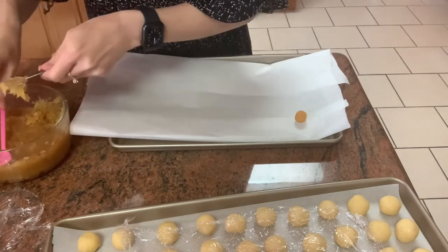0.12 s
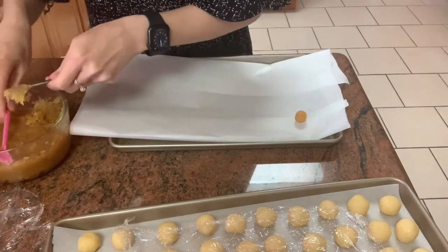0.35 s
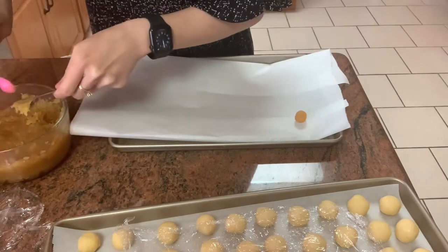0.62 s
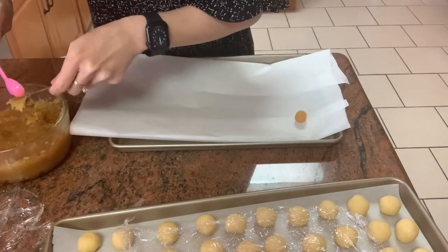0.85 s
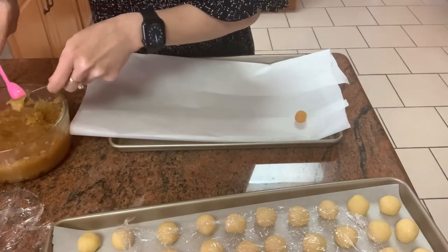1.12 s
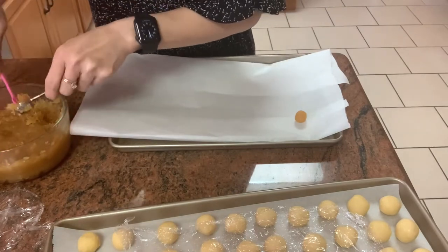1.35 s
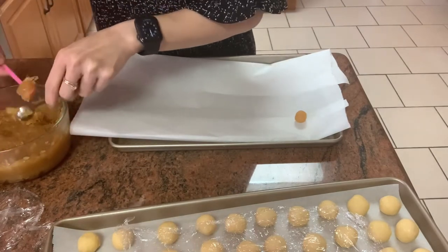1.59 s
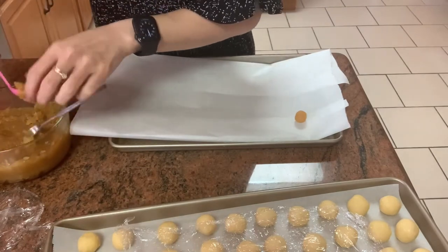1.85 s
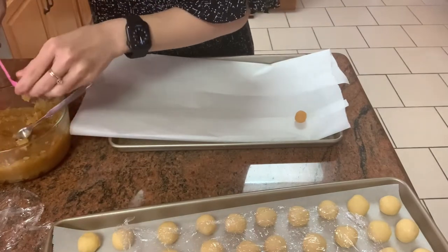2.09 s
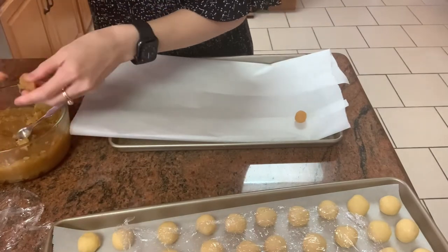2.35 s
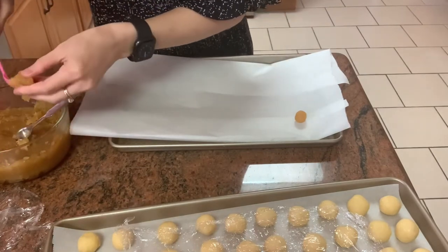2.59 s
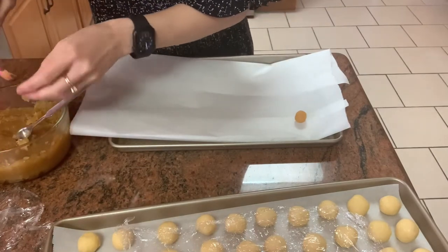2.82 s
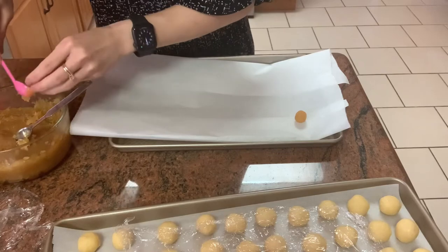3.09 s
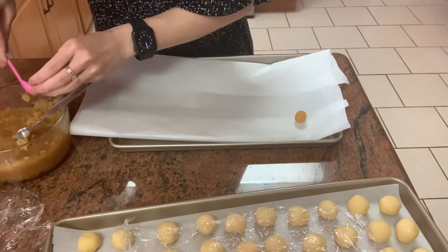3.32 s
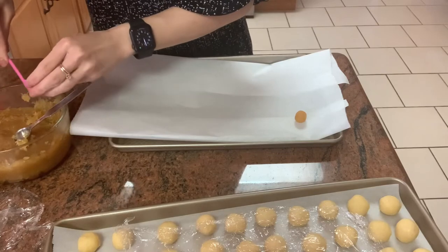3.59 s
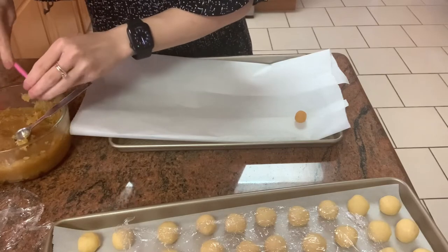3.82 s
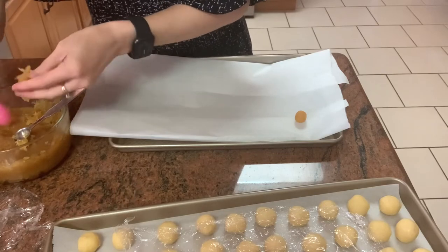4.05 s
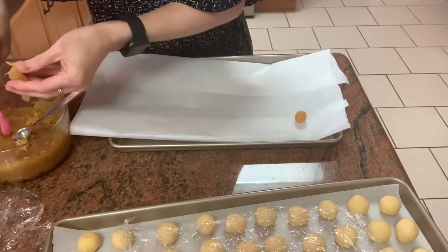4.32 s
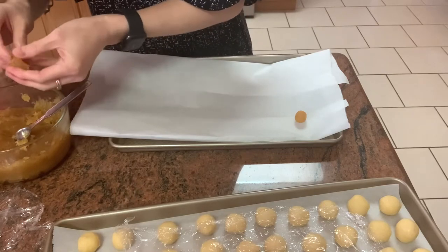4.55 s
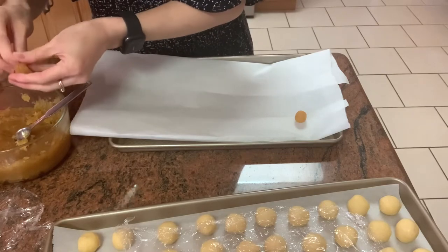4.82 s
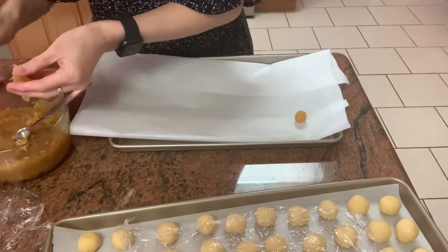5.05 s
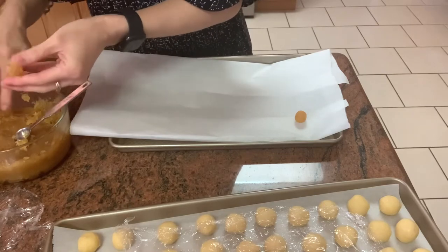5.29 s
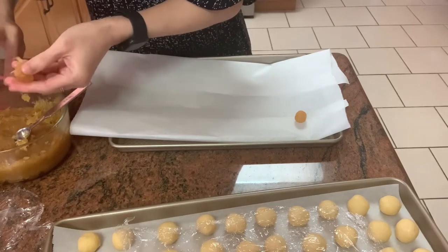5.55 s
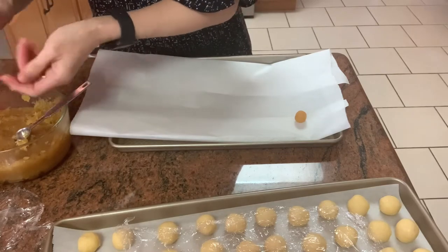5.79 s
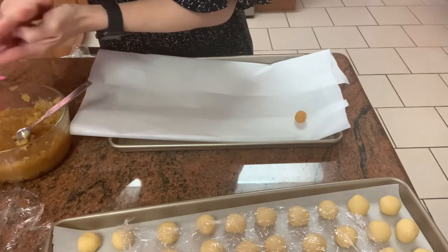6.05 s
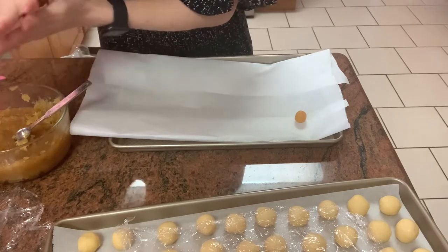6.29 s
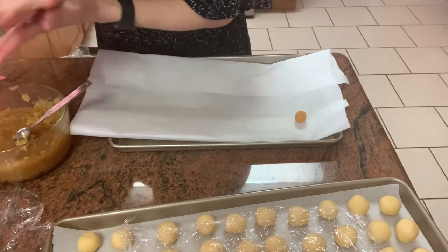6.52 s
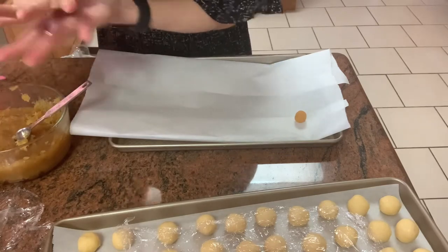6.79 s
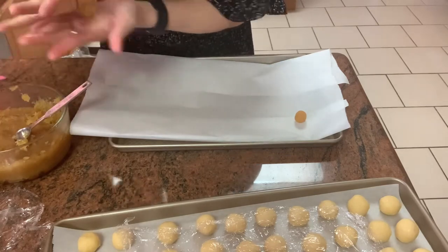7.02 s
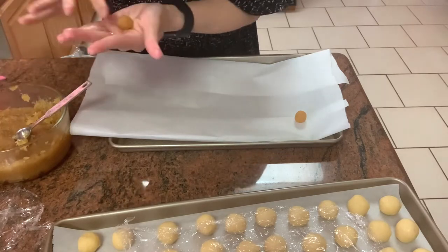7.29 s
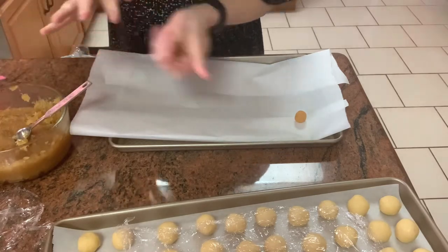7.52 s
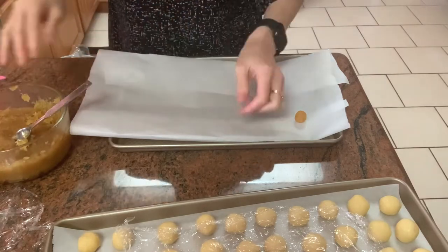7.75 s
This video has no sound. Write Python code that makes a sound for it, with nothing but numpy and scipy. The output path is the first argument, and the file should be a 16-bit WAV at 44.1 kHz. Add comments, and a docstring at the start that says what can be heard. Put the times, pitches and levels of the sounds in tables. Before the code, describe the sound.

Quiet tiled kitchen with appliance hum: bright spoon-on-glass clinks, a rattling utensil drop, sticky hand rubbing, then one flat slap across the room.

```python
"""Spoon, glass and jam in a kitchen

A steel measuring spoon clinks on a glass bowl of jam and a utensil clatters down beside it: damped modes.
Sticky fingers tick, palms rub a ball of jam round and something flat slaps down across the kitchen: shaped noise.
Appliances hum as coloured noise; tiles answer with decaying noise tails. Two microphone ports are alike in
the bass, and in the treble carry one signal that reaches the right side later."""
import sys
import numpy as np
from scipy import signal
from scipy.fft import rfft, irfft, next_fast_len
from scipy.io import wavfile
from scipy.ndimage import uniform_filter1d, map_coordinates

SR = 44100
rng = np.random.default_rng(int(sys.argv[2]) if len(sys.argv) > 2 else 0)


def to_wav(s):
    """Save 16-bit WAV."""
    ch = np.atleast_2d(s).T  # columns
    pcm = np.round(np.clip(ch, -1, 1) * 32767)  # PCM
    wavfile.write(sys.argv[1], SR, pcm.astype(np.int16))


def amplitude_ratio(level_db):
    """Convert a level in decibels to the matching linear amplitude (field) ratio."""
    exponent = np.asarray(level_db, float) / 20
    return 10 ** exponent


N = 347949  # samples

# Modes of the utensil's steel. Each row: frequency in Hz, relative level in dB, 60 dB decay time in seconds.
STEEL = [(1685, -10.5, 0.035), (2500, -26, .03), (3670, -27.5, 0.043), (4260, -31.5, 0.028),
         (5100, -22.5, 0.025), (5430, -4, 0.052), (6360, -0.5, 0.063), (7970, -7.5, 0.075),
         (8800, 0.5, 0.082), (10440, 3, 0.026), (12300, 1.5, .045), (12860, -8.5, 0.033),
         (14650, -0.5, 0.048), (15650, -3, .045), (15040, 4, 0.046)]
# Modes of the dull body under a knock, before its pitch factor.
# Each row: frequency in Hz, relative level in dB, 60 dB decay time in seconds.
BODY = [(417, -13.5, 0.037), (550, -11, 0.026), (716, 0.5, 0.022), (873.5, -2, 0.045), (985, -2, 0.024),
        (1136, -4, 0.0095), (1415, -13.5, 0.018), (1660, -10, 0.023), (1866, -7, 0.021), (2740, -14, 0.027),
        (2950, -16, 0.021), (3500, -15.5, 0.011)]
STEEL_WANDER, BODY_WANDER = 0.024, 0.005  # rms random phase step, cycles per sample


def unit(x):
    """Normalisation: scales a signal to rms 1."""
    return x / np.sqrt(np.mean(x ** 2) + 1e-20)


def along(points, hz):
    """Interpolation of (Hz, value) points on a logarithmic frequency axis."""
    f, v = np.transpose(points)
    return np.interp(np.log(hz + 1), np.log(f + 1), v)


def filtered(x, response):
    """Linear filtering: the spectrum is multiplied by a response of frequency."""
    n = x.shape[-1]
    m = next_fast_len(n + 8192)
    spectrum = rfft(x, m) * response(np.fft.rfftfreq(m, 1 / SR))
    return irfft(spectrum, m)[..., :n]


def swell(peaks, hz):
    """Resonance: a gain of 1 plus peaks given as (Hz, half width in Hz, dB)."""
    return 1 + sum(amplitude_ratio(db) / (1 + ((hz - centre) / width) ** 2) for centre, width, db in peaks)


def noise(spectrum, shape):
    """Coloured noise: white noise shaped by (Hz, dB) points, at rms 1."""
    white = rng.standard_normal(shape)
    return unit(filtered(white, lambda hz: amplitude_ratio(along(spectrum, hz))))


def add(track, s, x):
    """Superposition: mixes x into the track from time s in seconds."""
    i = round(s * SR)
    x = x[max(-i, 0):][:N - max(i, 0)]
    track[max(i, 0):][:len(x)] += x


def snap(centre_hz, breadth, t60):
    """Impulsive excitation: a decaying noise burst through one band-pass, at peak 1; breadth is width over centre."""
    t = np.arange(SR // 20) / SR
    burst = rng.standard_normal(len(t)) * amplitude_ratio(-60 * t / t60) * (1 - np.exp(-t / 0.00051))
    width_hz = breadth * centre_hz

    def band(hz):
        damping = 1j * hz * width_hz
        return damping / (centre_hz ** 2 - hz ** 2 + damping)

    burst = filtered(burst, band)
    return burst / np.abs(burst).max()


def ring(modes, t, scatter_db, attack, rough, tilt_db=0, early=0):
    """Modal synthesis: damped sines of random strength; rough contact makes every phase wander."""
    hz, db, t60 = np.transpose(modes)[:, :, None]
    tilt = tilt_db * np.log2(hz / 4000)  # dB per octave about 4 kHz
    size = amplitude_ratio(db + tilt + scatter_db * rng.standard_normal(hz.shape))
    wander = rough * np.cumsum(rng.standard_normal((len(hz), len(t))), 1)
    waves = np.sin(2 * np.pi * (hz * t + wander))
    decay = amplitude_ratio(-60 * t / t60) * (1 + early * amplitude_ratio(-60 * t / 0.022))  # early: extra ring that is soon damped
    onset = 1 - np.exp(-t / attack)
    return (size * decay * waves).sum(0) * onset / np.linalg.norm(amplitude_ratio(db))


def background():
    """Stationary noise: slowly drifting appliance rumble, raised at low room resonances, over steady hiss."""
    # Spectrum of the appliances. Each row: frequency in Hz, relative level per hertz in dB.
    hum_spectrum = [(13, -54), (22, -34), (55, -3), (139, -5.5), (170, -2.5), (205, -13), (246, -6.5),
                    (324, -15), (376, -10.5), (412, -19.5), (514, -24.5), (846, -26.5), (927, -34.5),
                    (1270, -29), (1800, -38.5), (2340, -75.5), (3960, -120)]
    # Low room resonances. Each row: frequency in Hz, half width in Hz, added gain in dB.
    room_modes = [(69.4, 3.8, 0.5), (113, 7.5, -1.5), (185.9, 16, 2), (255, 1.7, 2), (296, 5, 1.5),
                  (378.6, 4.3, 2.5), (491, 33, -1.5)]
    # Spectrum of the hiss. Each row: frequency in Hz, relative level per hertz in dB.
    air_spectrum = [(900, -17.5), (1800, -2), (3000, -5.5), (6000, -9), (12000, -7.5), (15000, -9.5),
                    (16200, -25)]
    hum_db, drift_db, drift_per_s = -53.5, 0.57, 3  # level, drift, random drift values per second
    drift = map_coordinates(rng.standard_normal(N // 1000), [np.arange(N) / SR * drift_per_s])
    hum = unit(filtered(noise(hum_spectrum, (2, N)), lambda hz: swell(room_modes, hz)))
    hiss = amplitude_ratio(-81) * noise(air_spectrum, (2, N))
    return amplitude_ratio(hum_db + drift_db * drift) * hum + hiss


def slaps():
    """Diffuse sound: a flat face lands and rattles out, as noise independent at each side since it is far off."""
    # Slaps. Each row: start in seconds, level in dB, landing time in seconds, treble limit in Hz (6 dB down).
    blows = [(-.09, -27, 0.053, 5440), (7.7333, -24, 0.022, 20700)]
    # Spectrum of a slap. Each row: frequency in Hz, relative level per hertz in dB.
    slap_spectrum = [(120, -57), (300, -7.5), (900, -7), (2800, -2.5), (4200, -5.5), (8000, -3.5),
                     (11000, -5.5), (16000, -6)]
    # Resonances that a slap sets ringing. Each row: frequency in Hz, half width in Hz, added gain in dB.
    tray = [(970, 29, 3), (1580, 120, -5), (2540, 35, -33), (2760, 50, -5.5), (2980, 23, -27),
            (3270, 49, -16), (4120, 150, 2), (6100, 66, -3), (6520, 90, -5), (8350, 380, -15)]
    out, t = np.zeros((2, N)), np.arange(SR // 2) / SR
    for s, db, landing, top_hz in blows:
        rattle_out = amplitude_ratio(-60 * np.maximum(t - landing, 0) / 0.088)
        shape = (1 - np.exp(-t / 0.00076)) * rattle_out
        source = noise(slap_spectrum, (2, len(t)))
        sound = filtered(source, lambda hz: swell(tray, hz) / (1 + (hz / top_hz) ** 2))
        add(out.T, s, (amplitude_ratio(db) * shape * sound).T)
    return out


def skin():
    """Sliding friction: palms and fingers hiss over a lower rasp that follows pressure, with tiny sticky catches."""
    # Strokes. Each row: time of full pressure in seconds, hiss level in dB, rasp level in dB,
    # rise in seconds, fade in seconds.
    strokes = [(.378, -75, -97, 0.067, 0.097), (1.052, -72, -98, 0.016, .04), (1.104, -71, -97, .01, 0.097),
               (1.433, -74, -84, 0.051, .03), (3.75, -90, -79, .04, 0.079), (4.005, -74, -93, 0.046, .08),
               (5.96, -61.5, -79, 0.062, 0.093), (6.128, -58, -75, .05, 0.12),
               (6.3, -73, -88, 0.047, 0.064), (6.376, -59, -74.5, 0.053, 0.081),
               (6.47, -73, -90, .06, 0.094), (6.599, -63.5, -73, 0.12, 0.11), (6.68, -71, -88, .06, .06),
               (6.785, -60.5, -71.5, 0.028, 0.081)]
    # Spectrum of the hiss. Each row: frequency in Hz, relative level per hertz in dB.
    hiss_spectrum = [(4000, -43), (7000, 1), (11000, 4.5), (15500, 10), (16500, -4)]
    # Spectrum of the rasp. Each row: frequency in Hz, relative level per hertz in dB.
    rasp_spectrum = [(1500, -16), (3000, 4), (4500, -0.5), (7000, -4), (10000, -16.5)]
    stroke_db, rasp_late_s = 23, 0.0094  # level lost over a rise or a fade; the rasp peaks after the hiss
    out = np.zeros(N)
    for s, hiss_db, rasp_db, rise, fade in strokes:
        t = np.arange(-2 * rise, 2 * fade, 1 / SR)

        def pressure(late):
            return amplitude_ratio(-stroke_db * np.maximum((late - t) / rise, (t - late) / fade))

        catches = (rng.random(len(t)) < 190 / SR) * rng.exponential(40, len(t))  # about 190 per second
        roughness = amplitude_ratio(1.5 * unit(uniform_filter1d(rng.standard_normal(len(t)), 60)))
        grit = unit(roughness + uniform_filter1d(catches, 40))
        # cupped palms favour a few bands
        hollows = np.c_[rng.uniform(2200, 6000, 3), np.full(3, 220), np.full(3, 5)]
        rasp = unit(filtered(noise(rasp_spectrum, len(t)), lambda hz: swell(hollows, hz)))
        hiss = noise(hiss_spectrum, len(t))
        rub = amplitude_ratio(hiss_db) * pressure(0) * hiss + amplitude_ratio(rasp_db) * pressure(rasp_late_s) * rasp
        add(out, s - 2 * rise, grit * rub)
    return out


def fingers():
    """Sudden release of adhesion: a sticky film of jam parts in a very short narrow-band snap."""
    # Sticky releases. Each row: start in seconds, peak level in dB, centre frequency in Hz.
    ticks = [(1.0464, -50, 14000), (1.1015, -51, 12200), (1.1323, -50, 9000), (1.263, -70, 4700),
             (1.4331, -61, 13400), (1.9458, -51, 13000), (3.4577, -59, 7450), (3.79, -59.5, 4330),
             (6.2085, -54, 10900), (6.2674, -51.5, 11900), (6.305, -59, 12160), (6.3453, -41.5, 10900),
             (6.55, -61, 14000), (6.6021, -52, 12100), (6.7406, -52, 11850), (6.869, -63, 12980),
             (7.4592, -64, 2860)]
    out = np.zeros(N)
    for s, db, centre_hz in ticks:
        add(out, s, amplitude_ratio(db) * snap(centre_hz, breadth=0.33, t60=0.0074))
    return out


def utensil():
    """Struck and scraped steel: modes jingle with each dry crack, and brief slides are noise through their bands."""
    # Strikes of the steel end. Each row: start in seconds, jingle level in dB, crack peak in dB.
    jingles = [(4.2997, -54, -44), (4.3798, -53.5, -45.5), (4.3933, -51, -48), (4.457, -61, -50.5),
               (4.561, -24.5, -25), (4.5833, -26.5, -31.5), (4.5885, -31, -28), (4.6144, -26.5, -25.5),
               (4.6181, -22, -28.5), (4.6274, -24.5, -29), (4.7427, -45, -38.5)]
    # Slides. Each row: start in seconds, length in seconds, rms level in dB, lowest frequency in Hz.
    slides = [(4.307, 0.025, -51, 1450), (4.377, 0.03, -60, 1510), (4.466, 0.025, -46.5, 591),
              (4.583, 0.02, -33.5, 4000), (4.734, 0.028, -49.5, 2500), (5.031, .02, -71, 3960)]
    out, t = np.zeros(N), np.arange(SR // 8) / SR
    for s, jingle_db, crack_db in jingles:
        add(out, s, amplitude_ratio(crack_db) * snap(centre_hz=8600, breadth=0.9, t60=0.0077))
        jingle = ring(STEEL, t, scatter_db=0.5, attack=0.00091, rough=STEEL_WANDER, early=1.4)
        add(out, s, amplitude_ratio(jingle_db) * jingle)
    bands = [(hz, 150, db) for hz, db, _ in STEEL]
    for s, length, db, low_hz in slides:
        n = round(length * SR)
        grains = rng.standard_normal(n) * np.hanning(n)
        slide = filtered(grains, lambda hz: swell(bands, hz) / (1 + (low_hz / (hz + 1)) ** 4))
        add(out, s, amplitude_ratio(db) * unit(slide))
    return out


def handle():
    """Coupled impact: dull modes pitched by the grip, a dry crack and a little shake of the steel."""
    # Knocks of the handle on the counter. Each row: start in seconds, knock level in dB, crack peak in dB,
    # pitch factor of the dull body.
    blows = [(4.3006, -51, -51, 0.94), (4.4807, -22, -25, 1.14), (4.5284, -26.5, -43.5, 1.01),
             (4.5716, -28, -31, .99), (4.6945, -26, -30, 1.1), (4.7155, -16.5, -17, 1.02),
             (4.7444, -35, -29, 1.4), (4.789, -30, -29, .97), (4.8096, -19.5, -33, 1),
             (4.8505, -56, -47, 1.4), (4.9051, -38, -52, 0.93), (4.9494, -41.5, -51.5, 0.81),
             (5.0463, -43.5, -38, 1.08), (5.0604, -42, -49, 0.96), (5.0978, -44.5, -53, 0.92)]
    shake_db = -32  # ring of the steel relative to the knock
    out, t = np.zeros(N), np.arange(SR // 8) / SR
    for s, knock_db, crack_db, pitch in blows:
        add(out, s, amplitude_ratio(crack_db) * snap(centre_hz=5500, breadth=0.9, t60=0.0097))
        body = np.multiply(BODY, [pitch, 1, 1])
        knock = ring(body, t, scatter_db=2.5, attack=0.0032, rough=BODY_WANDER, early=3.88)
        add(out, s, amplitude_ratio(knock_db) * knock)
        shake = ring(STEEL, t, scatter_db=1.5, attack=0.00036, rough=STEEL_WANDER)
        add(out, s, amplitude_ratio(knock_db + shake_db) * shake)
    return out


def spoon():
    """Modal impact: spoon and bowl ring together; a soft blow leaves out the high modes."""
    # Clinks. Each row: start in seconds, tick peak in dB, ring level in dB, knock level in dB,
    # tilt of the ring in dB per octave.
    clinks = [(0.1411, -29, -50, -49.5, -1), (1.6731, -33, -32, -34.5, -2.5),
              (1.725, -16.5, -26.5, -24.5, 2.3), (1.7354, -18.5, -45, -34.5, -0.35),
              (1.7589, -23, -37, -31.5, 1), (1.7734, -28, -35.5, -41.5, -0.8),
              (4.0821, -49.5, -61, -42.5, -7)]
    # Modes of spoon and bowl: frequencies in Hz.
    glass_hz = [850, 1200, 1540, 1830, 2035, 2780, 3560, 4075, 4300, 4740, 5400, 5465, 6560, 6785, 7685,
                8880, 9300, 9775, 10200, 10560, 11262, 11606, 12060, 13200, 13390, 13900, 14400, 15330]
    # The same modes in turn. Each row: relative level in dB, 60 dB decay time in seconds.
    glass_levels = [(-7, 0.08), (-9, 0.13), (-11, 0.21), (-7, .1), (-7, .24), (-11.5, 0.2), (-11, .36),
                    (-19.5, .3), (-22, 0.2), (-28, .12), (-11, 0.29), (-5.5, 0.31), (-9, 0.16), (-5.5, 0.3),
                    (-10, .24), (-12, .15), (-11.5, .1), (-6, 0.16), (-6, .17), (-14, .15), (-11.5, 0.071),
                    (-5, .1), (-8.5, 0.14), (-7.5, .14), (-5, .13), (-12.5, .1), (-10.5, 0.12), (-14, .12)]
    glass_wander = 0.012  # rms random phase step, cycles per sample
    glass = np.c_[glass_hz, glass_levels]
    bowl_body = np.multiply(BODY, [1.15, 1, 1])  # the bowl's thud lies above the counter's
    out, t = np.zeros(N), np.arange(SR * 2 // 5) / SR
    for s, tick_db, ring_db, knock_db, tilt_db in clinks:
        add(out, s, amplitude_ratio(tick_db) * snap(centre_hz=9000, breadth=2.6, t60=0.012))
        clink = ring(glass, t, scatter_db=2.5, attack=0.00042, rough=glass_wander, tilt_db=tilt_db, early=2.9)
        add(out, s, amplitude_ratio(ring_db) * clink)
        thud = ring(bowl_body, t[:SR // 8], scatter_db=4, attack=0.0018, rough=BODY_WANDER, early=0.87)
        add(out, s, amplitude_ratio(knock_db) * thud)
    return out


def widened(x):
    """Stereo widening: short random echoes, added at the left and subtracted at the right, spread near sounds."""
    echoes = np.zeros(SR // 100)
    delay = (rng.random(12) * (SR // 100 - 10) + 5).astype(int)  # samples
    echoes[delay] = amplitude_ratio(-10.5 - 600 * delay / SR) * rng.choice([-1, 1], delay.shape)
    spread = signal.fftconvolve(x, echoes)[:N]
    spread = filtered(spread, lambda hz: hz ** 2 / (hz ** 2 + 900 ** 2))  # the bass stays central
    return x + np.array([[1], [-1]]) * spread


def room(x):
    """Reverberation: tiles and cupboards answer with four decaying noise tails, crossfaded in turn."""
    # Reverberation time. Each row: frequency in Hz, 60 dB decay time in seconds.
    decay_times = [(200, 0.35), (1000, .45), (4000, 0.38), (8000, 0.35), (15000, 0.053)]
    wet, turn = 0, np.arange(N) / SR * 6 % 4  # six tails a second, out of four
    for k in range(4):
        hz, t, z = signal.stft(rng.standard_normal((2, SR * 3 // 5)), SR, nperseg=256)
        decay = amplitude_ratio(-60 * t / along(decay_times, hz)[:, None])
        tail = signal.istft(z * decay, SR, nperseg=256)[1]
        tail = tail / np.linalg.norm(tail[0])
        gate = np.clip(1 - np.abs((turn - k + 2) % 4 - 2), 0, 1)
        late = np.pad(x * gate, (220, 0))[None]  # the tail starts 5 ms after the sound
        wet = wet + signal.fftconvolve(late, tail, axes=1)[:, :N]
    return wet


def scene():
    """Superposition: widened near sounds, far slaps, the room's answer and the background."""
    bowl, knocks, steel = spoon(), handle(), utensil()
    hands, far = fingers() + skin(), slaps()
    struck = amplitude_ratio(-3.5) * bowl + amplitude_ratio(-3.5) * knocks + amplitude_ratio(-3.5) * steel
    wet = room(struck + amplitude_ratio(-7.5) * hands + amplitude_ratio(-1.5) * far[0])
    return widened(bowl + knocks + steel + hands) + far + wet + background()


def roll_off(x):
    """The treble ends steeply here."""
    return signal.sosfilt(signal.butter(12, 16970, fs=SR, output="sos"), x)


def record(dry):
    """Interchannel delay: the ports narrow bass and treble towards one signal and delay the right side."""
    # Stereo width. Each row: frequency in Hz, share of the side signal kept.
    side_share = [(60, 0.12), (300, 0.33), (700, 0.65), (2500, 0.97), (6000, .75), (7200, 0.25),
                  (16000, .05)]
    # Delay of the right side behind the left. Each row: frequency in Hz, delay in samples.
    right_lag = [(400, 0), (1500, 4), (3000, 9), (7000, 11.75), (16000, 11.55)]
    # Balance of the ports. Each row: frequency in Hz, left minus right in dB.
    balance = [(60, 3.5), (240, 0.5), (950, 0.5), (3770, -0.5), (15000, 0.5)]
    mid, side = (dry[0] + dry[1]) / 2, (dry[0] - dry[1]) / 2
    side = filtered(side, lambda hz: np.clip(along(side_share, hz), 0, 1))

    def top(hz):
        return 1 / (1 + (hz / 15950) ** 120)  # little passes above the band edge

    def half(hz):
        """Half of the level and time difference: the left takes it, the right its inverse."""
        lead = np.exp(1j * np.pi * hz * along(right_lag, hz) / SR)
        return amplitude_ratio(along(balance, hz) / 2) * lead

    sides = np.array([mid + side, mid - side])
    ports = filtered(sides, lambda hz: top(hz) * [half(hz), 1 / half(hz)])
    return roll_off(ports)


dry = scene()
out = record(dry)
to_wav(out)
```